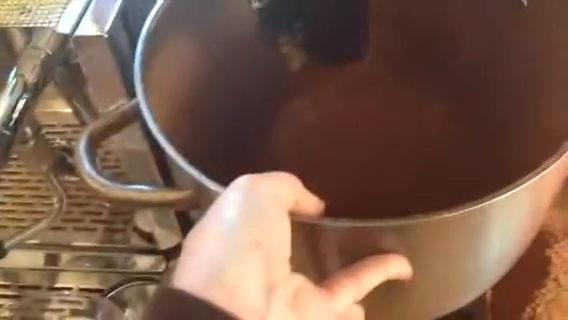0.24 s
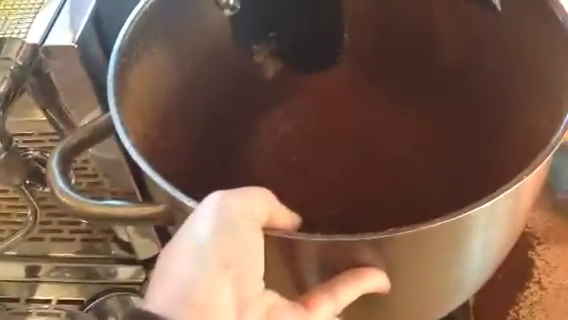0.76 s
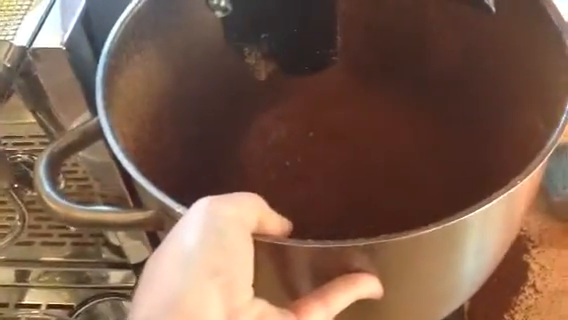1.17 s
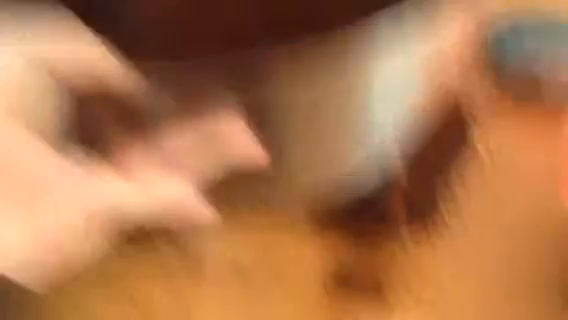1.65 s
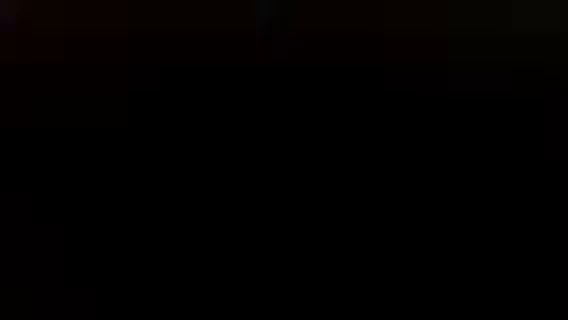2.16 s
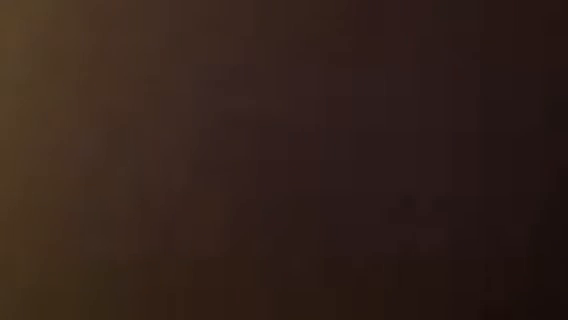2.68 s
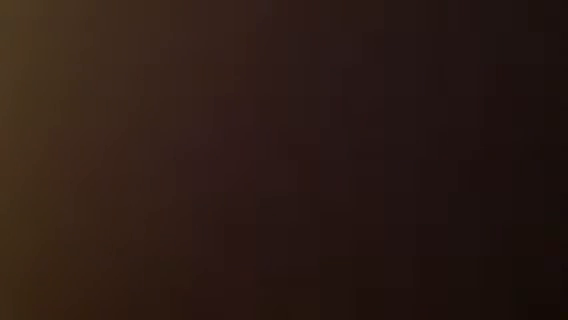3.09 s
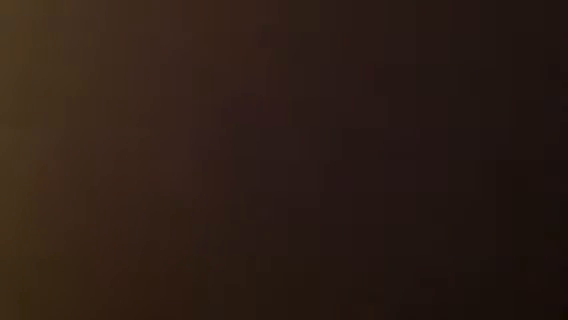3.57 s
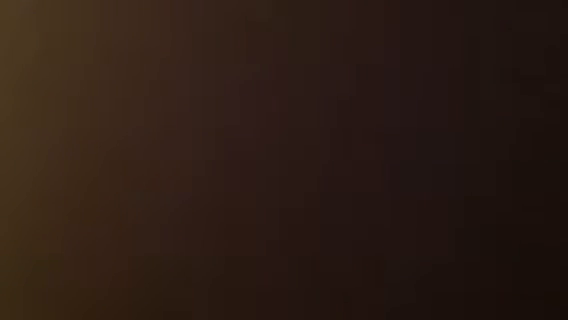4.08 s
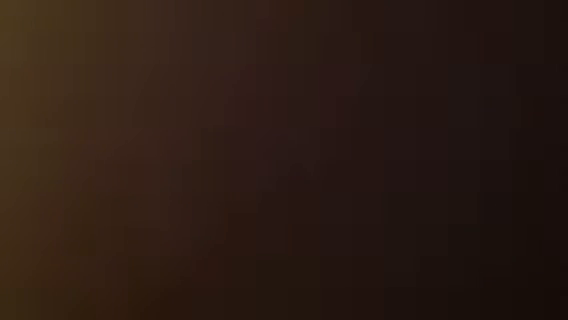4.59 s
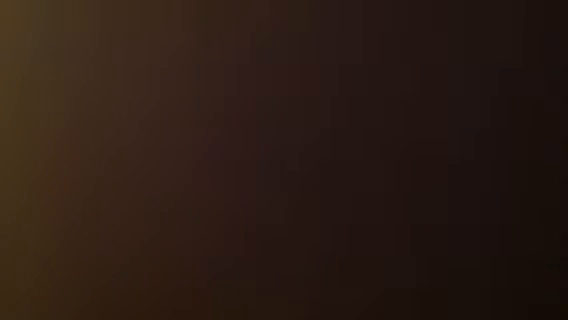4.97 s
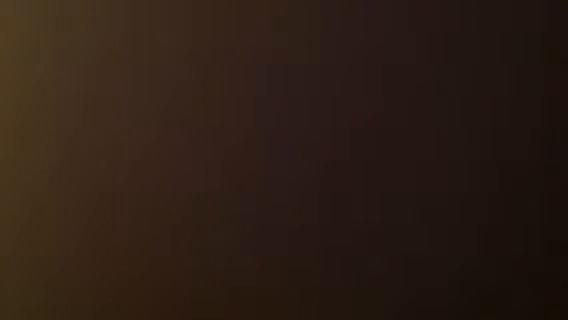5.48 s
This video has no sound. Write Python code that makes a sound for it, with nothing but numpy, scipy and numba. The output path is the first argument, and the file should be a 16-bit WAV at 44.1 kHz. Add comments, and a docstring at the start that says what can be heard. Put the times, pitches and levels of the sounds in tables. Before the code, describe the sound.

Harsh, rattling grinder whine close up, a thud and brief drop midway, a sharp switch click, quick stop, then faint handling ticks over room rumble.

```python
"""An electric coffee grinder runs into a steel bowl: bean cracks, shaped by chamber and housing resonances.
The microphone swings away, the counter's reflection sweeping its colour, and is laid down with a bump.
The bump, a short thud and a 20 kHz diaphragm ring, makes the gain control duck and recover.
A switch snaps (filtered noise and ringing parts) and ducks it again, and the grinder runs down.
A few clicks and faint brushes of a hand follow over the kitchen's rumble of noise and steady tones."""
import sys
import numpy as np
from scipy import signal
from scipy.fft import rfft, irfft, next_fast_len
from scipy.io import wavfile
from scipy.ndimage import uniform_filter1d, map_coordinates
from numba import njit

SR = 44100
rng = np.random.default_rng(int(sys.argv[2]) if len(sys.argv) > 2 else 0)


def unload_audio(sound):
    """Save the sound as a 16-bit wav file, at the path given as the first command line argument."""
    columns = np.transpose(np.atleast_2d(sound))
    # keep every value between -1 and 1, then stretch to whole-number steps
    steps = np.round(np.clip(columns, -1, 1) * 32767)
    wavfile.write(sys.argv[1], SR, steps.astype(np.int16))


N = 253134
T = np.arange(N) / SR  # time, s
SIZE = next_fast_len(N + SR)  # transform length, samples
FREQ = np.maximum(np.arange(SIZE // 2 + 1) * SR / SIZE, 1)  # bin frequencies, Hz

# where the microphone is: [t/s, place: 0 facing the bowl, 1 swung away, 2 lying]
MIC_PLACE = [(1.66, 0), (1.97, 0.85), (2.24, 1), (2.53, 1.76)]


def undb(db):
    """Decibels to gain."""
    return 10 ** (np.asarray(db) / 20)


def unit(x):
    """Scale to rms 1."""
    return x / np.sqrt(np.mean(x ** 2))


def curves(rows):
    """Each column of a (t/s, ..) table as one value a sample."""
    s, *columns = np.transpose(rows)
    return [np.interp(T, s, column) for column in columns]


def colour(points):
    """(f/Hz, level/dB) points joined on a log-frequency axis, as gain a bin."""
    hz, db = np.transpose(points)
    return undb(np.interp(np.log(FREQ), np.log(hz), db))


def shaped(x, gain):
    """Causal (minimum-phase) filter with the given gain a bin."""
    cepstrum = irfft(np.log(gain + 1e-7), SIZE)
    cepstrum[1:SIZE // 2] *= 2  # fold onto positive time
    cepstrum[SIZE // 2 + 1:] = 0
    return irfft(rfft(x, SIZE) * np.exp(rfft(cepstrum)), SIZE)[:N]


def above(hz, order=2):
    """Gain a bin of a high-pass."""
    return 1 / np.sqrt(1 + (hz / FREQ) ** (2 * order))


def walk(rate):
    """Random levels held 1 / rate s and slewed twice; spread near 1."""
    k = int(SR / rate)
    steps = np.repeat(rng.standard_normal(N // k + 1), k)
    return 1.3 * uniform_filter1d(uniform_filter1d(steps, k), k)[:N]


def fade(start, decay_s):
    """A sudden onset that dies away exponentially."""
    return (T >= start) * np.exp(-np.maximum(T - start, 0) / decay_s)


def bell(centre, half):
    """A smooth swell and sinking back, half lengths in s."""
    return np.exp(-.5 * ((T - centre) / half) ** 2)


def fractures(per_s=16000, scatter_db=2.0, feed_db=0.59, feed_rate=110):
    """Countless tiny cracks of beans between the burrs; the uneven feed varies their strength."""
    sizes = undb(scatter_db * np.minimum(rng.exponential(size=N), 5))  # many small cracks, few large
    cracks = (rng.random(N) < per_s / SR) * rng.choice([-1, 1], N) * sizes
    return cracks * undb(feed_db * walk(feed_rate))


def reflected(x, echo_db=-14, echo_decay_s=0.027):
    """Counter, bowl and machine add a short cloud of close reflections."""
    t = T[:SR // 8]
    cloud = rng.standard_normal(len(t)) * np.exp(-t / echo_decay_s)
    echo = unit(signal.fftconvolve(x, cloud)[:N])
    return x + undb(echo_db) * echo * np.std(x)


def run_down(coast_db_per_s, tail_db, off_s=3.84, stop_s=4.064, stop_decay_s=0.025, room_decay_s=0.053):
    """Level holds under power, slopes steadily as the burrs coast, then stops quickly with a room tail."""
    coast = undb(-coast_db_per_s * (np.clip(T, off_s, stop_s) - off_s))
    tail = undb(tail_db)
    last_cracks = (1 - tail) * fade(stop_s, stop_decay_s)
    return coast * ((T < stop_s) + last_cracks + tail * fade(stop_s, room_decay_s))


def grinder(drone_edge_hz=750, hiss_edge_hz=3900, low_hz=270):
    """Cracks ring chamber (drone) and housing (rattle) and spray powder (hiss), in a mix set by place."""
    # resonances of chamber, housing and bowl:
    # [f/Hz, width/Hz, boost/dB facing, boost/dB swung away, boost/dB lying]
    rings = np.array([(396, 23, 16, 8, 10), (450, 23, 16, 8, 4), (488, 17, 8, 0, 4), (529, 20, 13, 3, 0),
                      (740, 31, 10, 1, 3), (990, 70, 5, 4, 4), (1232, 51, 4, 6, 4), (1408, 18, 10, 6, 14),
                      (1475, 55, 14, 10, 10), (1571, 46, 2, 8, 8), (1631, 34, 0, 3, 9),
                      (1716, 25, 21, 16, 15), (1776, 35, 12, 4, 0), (1835, 36, 7, 9, 9),
                      (1913, 17, 15, 10, 13), (2018, 20, 10, 0, 0), (2131, 31, 0, 10, 13),
                      (2193, 19, 11, 6, 4), (2236, 28, 7, 3, 7), (2310, 36, 14, 8, 1), (2383, 74, 4, 10, 8),
                      (2849, 72, 10, 8, 8), (2902, 64, 12, 6, 0), (2993, 44, 7, 3, 6), (3118, 62, 5, 3, 0),
                      (3472, 94, 5, 4, 3), (3702, 93, 8, 5, 8), (3808, 35, 12, 8, 4), (4543, 118, 13, 5, 0),
                      (4718, 97, 15, 7, 1), (4979, 147, 10, 4, 0), (5580, 278, 6, 1, 4),
                      (6982, 49, 9, 4, 0), (7139, 89, 4, 7, 11), (7909, 50, 4, 7, 0), (8150, 247, 3, 5, 6),
                      (8483, 120, 6, 5, 3), (12050, 160, 2, 1, 5), (13005, 190, 6, 2, 2)])
    # broad colour of the crunch under them: [f/Hz, level/dB facing, level/dB swung away, level/dB lying]
    crunch = np.array([(280, -13, -8, -10), (335, -20, -10, -16), (450, -8, -3, -1), (700, -24, -16, -20),
                       (1000, -15, -11, -12), (1340, -11, -2, -10), (1800, -8, -2, -2), (2600, -8, -5, -5),
                       (3300, -7, -10, -8), (4100, -16, -12, -11), (4700, -15, -10, -10),
                       (6300, -14, -11, -14), (8700, -6, -8, -12), (9600, -15, -14, -21),
                       (13000, -12, -13, -21), (15000, -16, -15, -24)])
    # drone, rattle and hiss before the slow level changes: [level/dB facing, level/dB swung away,
    # level/dB lying, fall while the burrs coast/dB per s (negative rises), room tail/dB]
    voices = [(-28, -32, -28.5, -3, -3), (-16.5, -18, -15.5, 22.5, -15), (-20, -24, -24.5, 30.5, -18)]
    # slow rise and fall of each voice's level: [t/s, drone/dB, rattle/dB, hiss/dB]
    voice_levels = [(0, 2, -1.5, -0.5), (0.38, 0.3, -1, -0.3), (0.72, 0.5, 0, 1), (0.97, -1.5, 0, 1.5),
                    (1.1, 1, -0.5, 0.8), (1.5, 0.5, 0.4, 2), (1.62, -2, -2.2, -1.6), (1.76, 2, 0.1, 3),
                    (2.02, -0.5, 0, 1), (2.23, 2.5, 1.5, 1), (2.29, 1.5, 0.5, -1.5), (2.47, 0.5, 0.7, -0.5),
                    (2.52, 0.5, 2, 3.5), (2.68, 0.5, 0, 1.5), (2.82, 1, 2, 2.5), (3.08, 0, 0.5, 2),
                    (3.26, 0, 0.1, 1.5), (3.55, 0.5, 0.3, 2.5), (3.81, 2, -0.2, 2.5), (3.87, 0, 0, 1)]
    place, = curves(MIC_PLACE)
    cracks = fractures()
    peaks = 1 / (1 + (2 * (FREQ - rings[:, :1]) / rings[:, 1:2]) ** 2)
    upper, top = above(drone_edge_hz, order=6) ** 2, above(hiss_edge_hz, order=12) ** 2
    bands = [1 - upper, upper - top, top]
    envelopes = [run_down(coast, tail_db) * undb(level_db)
                 for (*_, coast, tail_db), level_db in zip(voices, curves(voice_levels))]
    out = 0
    for k in range(3):  # the three places
        resonance = np.sqrt(1 + (undb(rings[:, 2 + k]) ** 2 - 1) @ peaks)
        gain = resonance * colour(crunch[:, [0, 1 + k]]) * above(low_hz, order=3)
        heard = rfft(shaped(reflected(cracks), gain), SIZE)
        share = np.maximum(1 - np.abs(place.clip(0, 2) - k), 0)  # one place blends into the next
        for band, envelope, voice_db in zip(bands, envelopes, voices):
            voice = unit(irfft(heard * band, SIZE)[:N])
            out = out + share * envelope * undb(voice_db[k]) * voice
    return out


def wandering(x, flicker_db=0.98, flicker_rate=35, waver_s=0.00029, waver_rate=8):
    """A sway in time bends the pitch of the resonances, and five octave bands flutter independently."""
    x = map_coordinates(x, [(T + waver_s * walk(waver_rate)) * SR], order=5, mode="mirror")
    spectrum, octave = rfft(x, SIZE), np.log2(FREQ / FREQ[-1])
    out = x
    for k in range(1, 6):  # octaves below the top bin
        band = irfft(spectrum * np.maximum(1 - np.abs(octave + k), 0), SIZE)[:N]
        out = out + band * (undb(flicker_db * walk(flicker_rate)) - 1)
    return out


def swung(x, counter_db=-14, far_s=0.00104, near_s=0.000395):
    """As the microphone swings down, the counter's reflection arrives ever sooner and sweeps the colour."""
    place, = curves(MIC_PLACE)
    lag = np.interp(T, [MIC_PLACE[0][0], MIC_PLACE[2][0]], [far_s, near_s])
    share = undb(counter_db) * np.maximum(1 - np.abs(place - 1), 0)  # strongest when swung away
    return (x + share * np.interp(T - lag, T, x)) / np.sqrt(1 + share ** 2)


def band_boosts(x):
    """Chosen narrow bands are boosted briefly, some as the microphone swings, others as random fluctuation."""
    # boosted bands: [t/s, half length/s, f/Hz, width/Hz, boost/dB]
    boosts = [(0.1, .025, 1739, 70, 5.5), (0.2, .025, 440, 45, 3.5), (0.72, .03, 1700, 60, 4),
              (1.08, 0.036, 465, 60, 8), (1.275, .016, 1700, 70, 6.5), (1.51, .03, 443, 60, 6),
              (1.73, 0.035, 3860, 160, 6.5), (1.75, 0.018, 450, 45, 4.5), (1.957, 0.018, 1350, 351, 5.5),
              (2.0, 0.035, 345, 35, 4), (2.1, 0.072, 7600, 300, 4), (2.2, .03, 1905, 50, 6.5),
              (2.24, .03, 3520, 250, 10), (3.088, 0.054, 2150, 140, 7), (3.11, 0.017, 434, 50, 10),
              (3.14, 0.036, 5500, 300, 6.5), (3.15, 0.021, 7500, 1200, 5), (3.8, 0.052, 395, 29.8, 4.5)]
    out = x
    for s, half, hz, width_hz, boost_db in boosts:
        band = signal.lfilter(*signal.iirpeak(hz, hz / width_hz, fs=SR), x)
        out = out + band * (undb(boost_db) - 1) * bell(s, half)
    return out


def kitchen(flutter_db=1, waver_db=3):
    """Machines rumble and hum in the room: coloured noise under steady tones of wavering strength."""
    # colour of the rumble: [f/Hz, level/dB per Hz]
    rumble_colour = [(18, -66), (30, -27.5), (119, -11), (195, -2), (415, -5), (472, -5), (552, -11),
                     (612, -7.5), (815, -13), (1110, -18), (1270, -20), (1560, -23), (3500, -28),
                     (8690, -41.5), (15000, -56)]
    # mean level of the rumble, which also carries the hum: [t/s, level/dB]
    rumble_level = [(4.2, -45.5), (4.31, -43.5), (4.41, -47.5), (4.5, -44.5), (4.88, -44), (5.05, -42.5),
                    (5.5, -43), (5.62, -41.5)]
    # tones of the kitchen's machines: [f/Hz, mean level/dB re rumble]
    tones = [(100, -25.5), (148, -17), (205, -17), (258, -23.5), (344, -12.5), (748, -25), (1260, -23),
             (2379, -33.5)]
    db, = curves(rumble_level)
    noise = unit(shaped(rng.standard_normal(N), colour(rumble_colour)))
    rumble = noise * undb(flutter_db * walk(10))
    hum = 0
    for hz, tone_db in tones:
        strength = np.sqrt(2) * undb(tone_db + waver_db * walk(1.52))
        hum = hum + strength * np.sin(2 * np.pi * hz * T + walk(18))  # the phase wanders too
    return undb(db) * (rumble + hum)


def rubs(grain_db=3, grain_rate=260):
    """The microphone's case drags on hand and counter in small jerks: a rough, low scuffle."""
    # rubs of the case: [t/s, level/dB, half length/s]
    drags = [(2.138, -40, .08), (2.253, -29, .008), (2.525, -26, .005), (3.68, -43, 0.056)]
    # colour of the scuffle: [f/Hz, level/dB]
    rub_colour = [(70, -23), (170, -0.5), (320, -2.5), (800, -6), (3000, -24), (15000, -35)]
    scuffle = unit(shaped(rng.standard_normal(N), colour(rub_colour)))
    swell = sum(undb(db) * bell(s, half) for s, db, half in drags)
    return scuffle * swell * undb(grain_db * walk(grain_rate))


def bumps(diaphragm_hz=20000, diaphragm_s=.0006):
    """A short, dead thud of the case; a hard bump also rings the diaphragm strongly near 20 kHz."""
    # bumps of the microphone's case: [t/s, thud level/dB, thud f/Hz, half length/s, diaphragm ring level/dB]
    knocks = [(2.2468, -5, 380, 0.0011, 16.5), (2.521, -14, 230, 0.0012, -27),
              (2.528, -21, 760, 0.0013, -30), (2.531, -9.5, 290, 0.0014, -30),
              (3.8345, -14, 1070, 0.0011, 6)]

    def burst(s, db, hz, half):
        return undb(db) * bell(s, half) * np.sin(2 * np.pi * hz * (T - s))

    out = 0
    for s, db, hz, half, ring_db in knocks:
        out = out + burst(s, db, hz, half) + burst(s, ring_db, diaphragm_hz, diaphragm_s)
    return out


def ring(modes, blows):
    """Blows (t/s, level/dB) ring the modes (f/Hz, level/dB, t60/s) of an object."""
    t = T[:SR // 2]
    response = sum(undb(db - 60 * t / t60) * np.sin(2 * np.pi * hz * t) for hz, db, t60 in modes)
    hits = np.zeros(N)
    for s, db in blows:
        hits[int(s * SR)] += undb(db)
    return signal.fftconvolve(hits, response)[:N]


def clicks(tail_decay_s=0.049, contact_s=0.00038, case_trim_db=-6, wall_s=0.0062, wall_db=-11):
    """A short crack, the ring of part and case, a slap from the wall and the kitchen's brief reverberation."""
    # clicks of switch and handled parts: [t/s, level/dB, lower edge/Hz, decay/s, room tail/dB re click,
    # part pitch ratio, case ring/dB re click before the trim, part ring/dB re click]
    snaps = [(3.834, 2, 6460, 0.0017, -20.5, 0.88, -41, -24),
             (4.0235, -14.5, 5460, 0.0026, -19.5, 2, -28, -5),
             (5.1211, -24, 300, 0.0036, -17.5, 0.81, -2, -11.5),
             (5.3034, -30, 1500, 0.002, -19, 1.04, -21, -7),
             (5.4558, -32, 2700, 0.0017, -21, 1.02, -21, -8), (5.566, -44, 3020, .004, -16, .96, -16, -10),
             (5.6187, -31.5, 2000, 0.0019, -25, 0.95, -14, -12)]
    # colour of the crack: [f/Hz, level/dB]
    click_colour = [(200, 0.5), (650, 6), (950, 3), (1350, 9), (2500, -3.5), (4200, -0.5), (4900, -10),
                    (6500, -14), (9500, -19), (15000, -29)]
    # what the case rings with: [f/Hz, level/dB, t60/s]
    case = [(197, -2, 0.37), (343, 2, 0.14), (452, -2, 0.17), (1290, 7, 0.035), (1500, -2, 0.06),
            (2160, -8, 0.11), (2500, -3, 0.058), (4240, -2, 0.028)]
    # what the small clicking parts ring with, before the pitch ratio: [f/Hz, level/dB, t60/s]
    parts = np.array([(3100, 1, .035), (3215, -12, 0.15), (3260, -11, .12), (3490, -9, .05),
                      (3700, -5, .035), (4100, -10, .055), (4400, -12, 0.027), (6000, -15, .03)])
    noise = shaped(rng.standard_normal(N), colour(click_colour))
    out = ring(case, [(s, db + case_db + case_trim_db) for s, db, *_, case_db, _ in snaps])
    for s, db, edge_hz, decay_s, tail_db, pitch, _, part_db in snaps:
        high_pass = signal.butter(2, edge_hz, "high", fs=SR, output="sos")
        crack = unit(signal.sosfilt(high_pass, noise))
        slap = undb(wall_db) * fade(s + wall_s, decay_s)
        tail = undb(tail_db) * fade(s, tail_decay_s)
        contact = 1 - fade(s, contact_s)  # softens the onset
        envelope = contact * (fade(s, decay_s) + slap + tail)
        out = out + undb(db) * crack * envelope
        out = out + ring(parts * [pitch, 1, 1], [(s, db + part_db)])
    return out


def brushes(grain_db=2):
    """Skin slides over the case with a faint, grainy hiss."""
    # soft brushes of a hand: [t/s, level/dB, half length/s]
    strokes = [(4.335, -60, .02), (4.508, -58.5, .04), (4.87, -64, .03), (5.0, -61.5, 0.027)]
    skin = colour([(500, -0.5), (3000, 0), (7000, -2), (10000, -12), (15000, -15)])
    hiss = unit(shaped(rng.standard_normal(N), skin))
    swell = sum(undb(db) * bell(s, half) for s, db, half in strokes)
    return hiss * swell * undb(grain_db * walk(170))


def scene():
    """Everything reaches one microphone, the same on both channels."""
    grind = band_boosts(swung(wandering(grinder())))
    mono = grind + kitchen() + rubs() + bumps() + clicks() + brushes()
    return np.tile(mono, (2, 1))


@njit
def held_peak(x, fall):
    """Follows peaks at once and lets go slowly."""
    out, e = np.empty(len(x)), 0.
    for i in range(len(x)):
        e = max(abs(x[i]), e * fall)
        out[i] = e
    return out


def record(dry, ceiling=0.55, recover_s=0.31, bass_hz=90, top_hz=15200):
    """Gain control ducks at once under hard knocks and recovers slowly; deepest bass and top are cut."""
    # the gain control senses the diaphragm ring, which the top cut then removes
    loudness = np.sqrt(np.abs(uniform_filter1d(dry[0] ** 2, size=64)))
    excess_db = 20 * np.log10(np.maximum(loudness / ceiling, 1))
    duck_db = held_peak(excess_db, float(np.exp(-1 / (recover_s * SR))))
    bass_cut = signal.butter(3, bass_hz, "high", fs=SR, output="sos")
    thinned = signal.sosfilt(bass_cut, dry * undb(-duck_db))
    return signal.sosfilt(signal.ellip(10, .2, 80, top_hz, fs=SR, output="sos"), thinned)


dry = scene()
out = record(dry)
unload_audio(out)
```